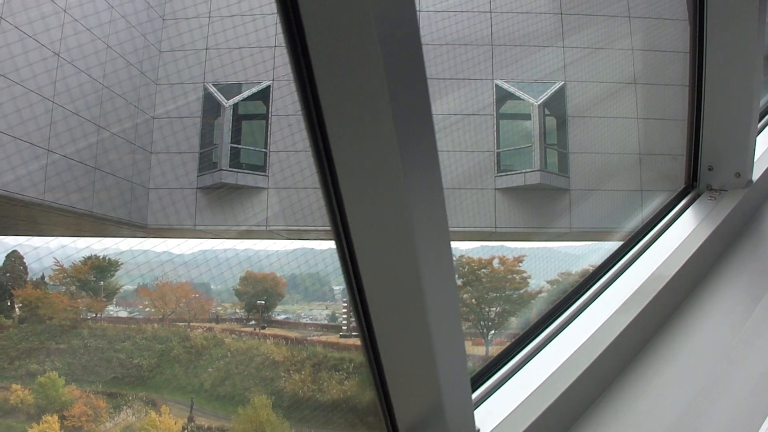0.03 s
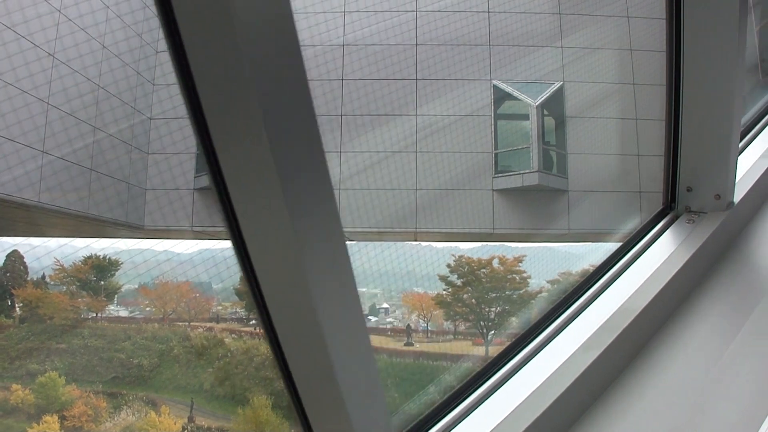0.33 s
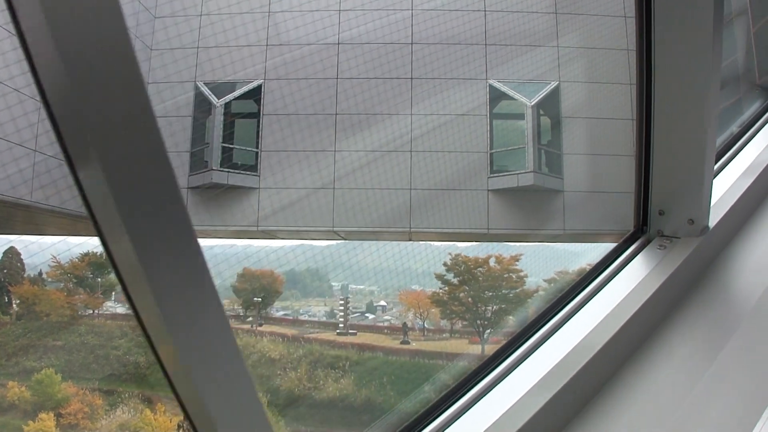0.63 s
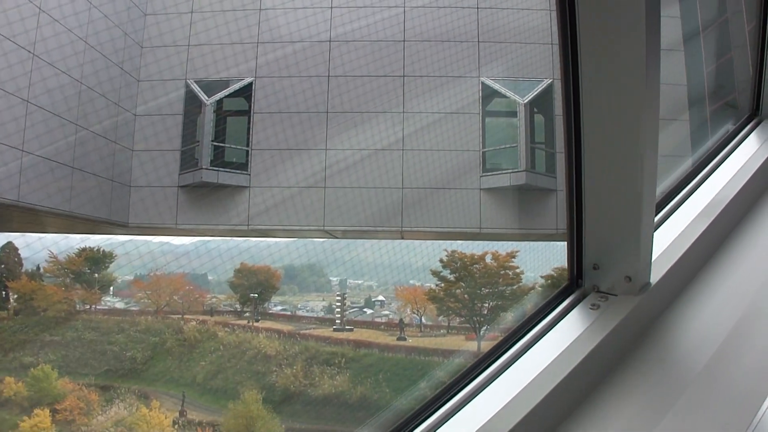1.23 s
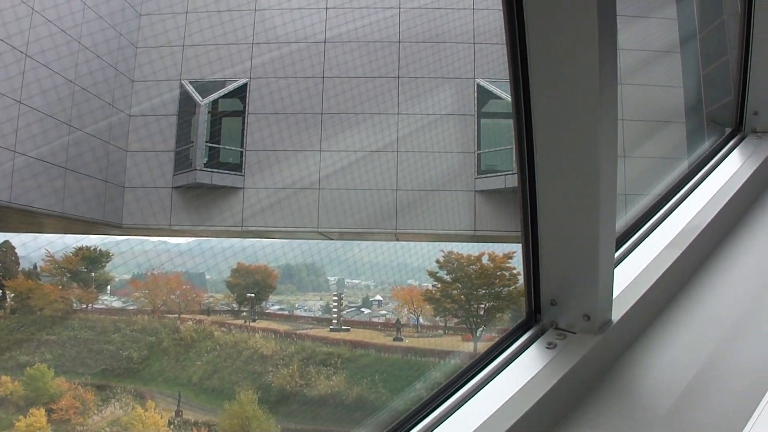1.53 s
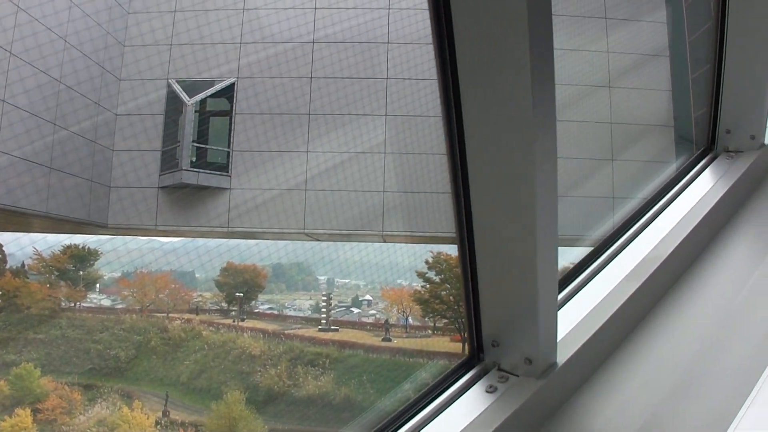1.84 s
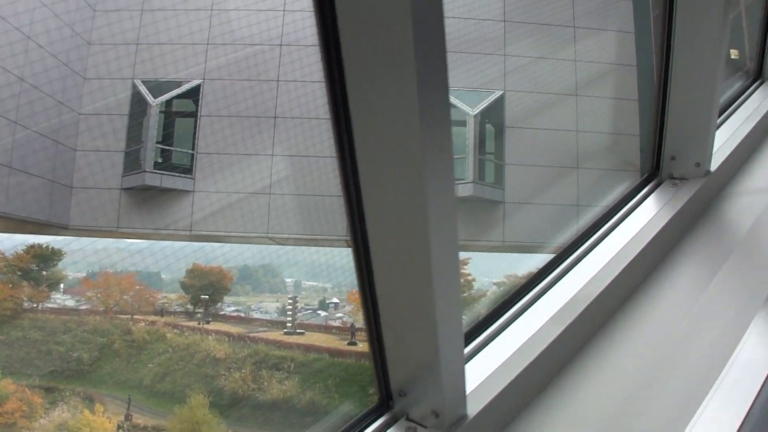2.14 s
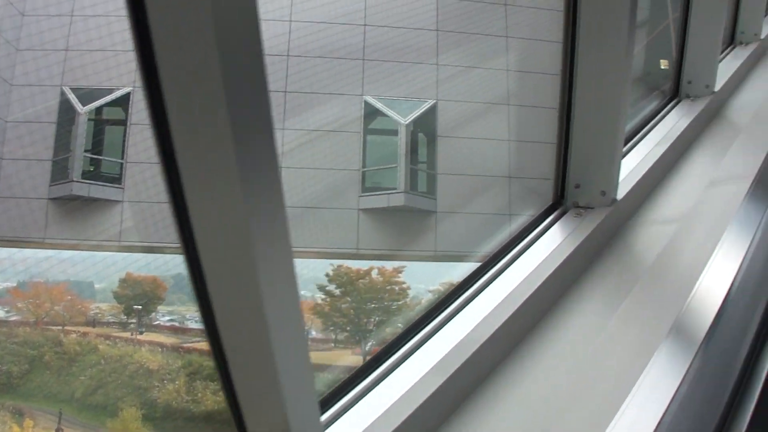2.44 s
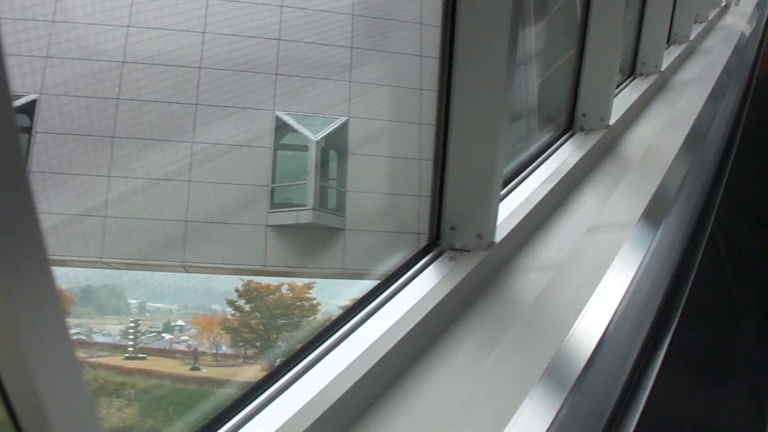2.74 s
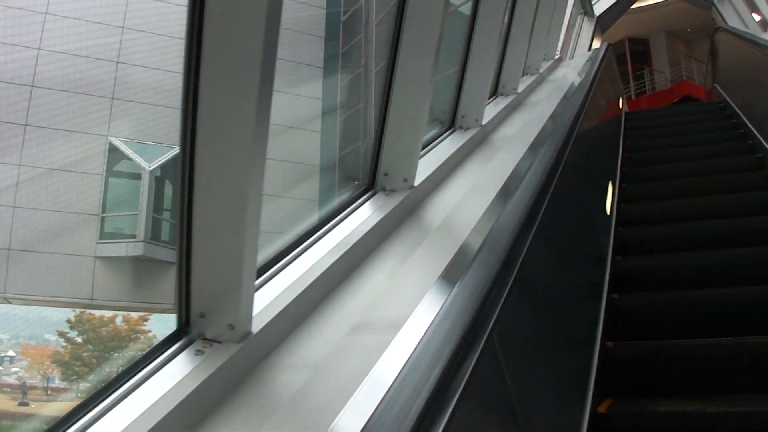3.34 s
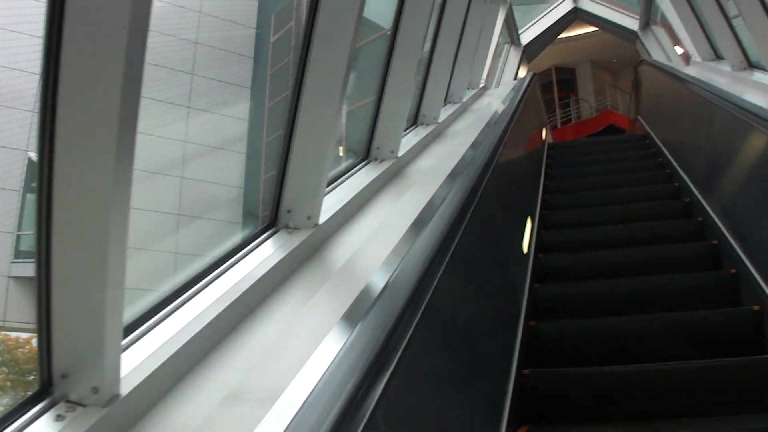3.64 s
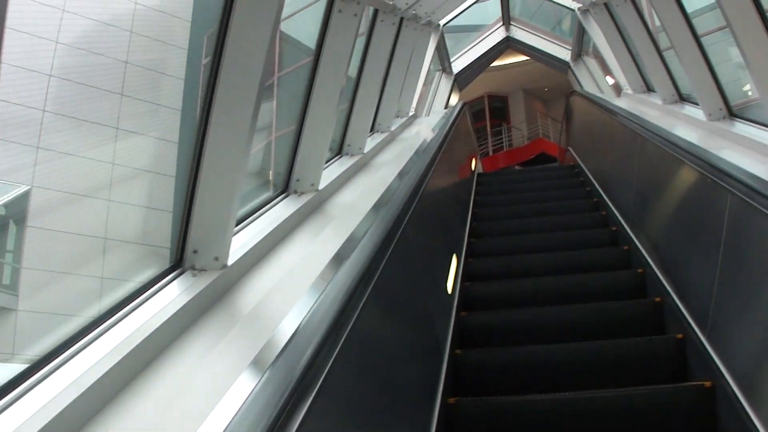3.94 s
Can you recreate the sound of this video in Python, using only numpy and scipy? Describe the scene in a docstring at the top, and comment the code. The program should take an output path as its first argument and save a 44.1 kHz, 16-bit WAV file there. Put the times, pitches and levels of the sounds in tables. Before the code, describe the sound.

An escalator runs with a steady rumble, low motor hum and faint wavering whine.

```python
"""Escalator ride up a glazed gallery

Steps and rollers rumble in the ringing truss over a low motor hum; now and then a roller groans.
The drive gear whines near 1.1 kHz, swelling and fading as the rider moves through the hall's
reflections. A hand-held camera adds its hiss and notches the treble."""
import sys
import numpy as np
from scipy import signal
from scipy.fft import rfft, irfft
from scipy.io import wavfile
from scipy.ndimage import uniform_filter1d

SR = 44100
rng = np.random.default_rng(int(sys.argv[2]) if len(sys.argv) > 2 else 0)


def wav_out(sig):
    """Save sig, one row per channel (or a flat mono array), as 16-bit PCM at SR to the path in sys.argv[1]."""
    wavfile.write(sys.argv[1], SR, np.round(np.clip(np.atleast_2d(sig).T, -1, 1) * 32767).astype(np.int16))


N = 176400

# Tone colour of the rolling steps and handrail: frequency_hz, relative_db
RUSH_SPECTRUM = [(20, -63), (48, -52), (66, -24), (90, -18.5), (150, -14), (185, -6), (240, -4),
                 (265, -3.5), (390, 1), (440, 0), (560, -1), (660, 2.5), (820, 2.5), (1020, -1),
                 (1400, -2.5), (1900, -6), (2350, -8), (2750, -18.5), (3500, -23.5), (5000, -29),
                 (9000, -50)]
# Swells of the gear's mesh tone along the ride: time_s, relative_db
WHINE_ENVELOPE = [(0.05, -36.5), (0.2, -31.5), (0.3, -41.5), (0.44, -33), (0.61, -38), (0.7, -32.5),
                  (0.97, -39), (1.28, -32), (1.41, -42), (1.48, -36), (1.63, -31.5), (1.7, -43),
                  (1.85, -43), (1.91, -26.5), (2.0, -29.5), (2.05, -38), (2.12, -28.7), (2.32, -31.5),
                  (2.57, -37), (2.83, -37.0), (2.92, -45), (3.1, -36.7), (3.19, -43.1), (3.27, -29),
                  (3.38, -48), (3.46, -32), (3.69, -37), (3.78, -29.7), (4.0, -43.2)]
# Side tones, in multiples of the shaft speed above the mesh tone: shaft_order, level_db
SHAFT_TONES = [(1, -41.5), (2, -49), (4, -45.5)]
# Resonances of the truss and steps: pitch_hz, half_width_hz, level_db
TRUSS_MODES = [(195.4, 12.6, -47), (212.6, 8.2, -48), (260.2, 11.5, -44), (289, 19, -43), (322, 20, -41.5),
               (337, 7.8, -45), (384, 23, -49.5), (479.5, 20, -43.5), (608, 39, -40.5), (757, 35, -41.5),
               (921, 4.9, -43.5), (1946, 18, -48), (2316, 13, -56), (2410, 14, -58)]
# Brief groans of the rollers: start_s, length_s, pitch_hz, level_db
ROLLER_GROANS = [(0.164, 0.2, 619, -33), (1.216, .2, 327, -34), (2.08, 0.133, 320, -36),
                 (2.4, 0.11, 326, -37)]
# Partials of the motor hum at mid-ride: pitch_hz, level_db
MOTOR_PARTIALS = [(97.5, -60), (190, -48.5)]
# Tone colour of the hiss: frequency_hz, relative_db
HISS_SPECTRUM = [(1000, -12.5), (3000, -7.5), (4500, -15), (5500, 1), (6300, 3), (7400, 2.5), (9000, -3),
                 (10000, -7), (11000, -14.5), (11700, -32), (12800, -53), (14000, -29), (15000, -19.5),
                 (15700, -17)]
# Stereo width, as an EQ on the side channel: frequency_hz, gain_db
STEREO_WIDTH = [(30, -20), (120, -23), (250, -27), (500, -20), (1000, -15.5), (2000, -10.5), (3500, -8.5),
                (6000, -5.5), (8000, -3), (10500, -.5), (15000, 2)]
# Where the camera's notch filters cut: centre_hz
NOTCH_CENTRES = [3010, 4010, 4990, 12100, 13450]
# How far each notch reaches to either side: half_width_hz
NOTCH_WIDTHS = [386, 465, 386, 700, 700]


def step_rush(level_db=-28.5, swell_db=0.32, flutter_db=0.25):
    """The main bed: steps and handrail roll along their tracks, never quite evenly."""
    level = amp(level_db + swell_db * wander(4) + flutter_db * wander(30))
    return level * shaped_noise(RUSH_SPECTRUM, patch_db=0.8)


def gear_whine(mesh_hz=1098.3, shaft_hz=24.8, waver_hz=1.46, smear_hz=6.2, trim_db=1):
    """Meshing teeth sing a tone, with side tones spaced by the shaft speed; the hall scatters them."""
    t = np.arange(N) / SR
    swells = amp(trim_db + np.interp(t, *np.transpose(WHINE_ENVELOPE)))
    mesh = phasor(mesh_hz + waver_hz * wander(2.84))
    mid = unit((mesh * (1 + 0.46 * drift(10.2))).real)
    side = 0.65 * unit((mesh * drift(smear_hz)).real)
    whine = swells * np.array([mid, side])
    for order, db in SHAFT_TONES:
        tone = mesh * phasor(round(order) * shaft_hz)
        whine += amp(db) * np.array([unit((tone * drift(smear_hz)).real) for _ in range(2)])
    return whine


def truss_ring(jolt_db=0.5, jolt_hz=5.8):
    """Uneven jolts of the rollers keep the frame's resonances ringing."""
    jolts = unit(amp(jolt_db * wander(jolt_hz)))
    hz = np.fft.rfftfreq(N, 1 / SR)
    power = np.zeros_like(hz)
    for pitch, half_width, db in TRUSS_MODES:
        resonance = unit(1 / (1 + ((hz - pitch) / half_width) ** 2))
        power += (amp(db) * resonance) ** 2
    shaking = rng.standard_normal((2, N))
    return jolts * irfft(rfft(shaking) * np.sqrt(power), N)


def roller_groans(waver_hz=3.95):
    """A roller sings for a moment, swelling and dying away."""
    t = np.arange(N) / SR
    groans = np.zeros(N)
    for start, length, pitch, db in ROLLER_GROANS:
        arch = np.sin(np.pi * np.clip((t - start) / length, 0, 1))
        tone = unit(phasor(pitch + waver_hz * wander(15.5)).real)
        groans += amp(db) * arch * tone
    return groans


def motor_hum(rise_db_per_s=2.3, wobble=1.1):
    """The motor's low, unsteady hum grows as the rider climbs."""
    climb = amp(rise_db_per_s * (np.arange(N) - N / 2) / SR)
    hum = np.zeros((2, N))
    for channel in hum:
        for pitch, db in MOTOR_PARTIALS:
            partial = phasor(pitch) * (1 + wobble * drift(5.4))
            channel += amp(db) * unit(partial.real)
    return climb * hum


def camera_hiss(level_db=-46, flicker_db=0.53):
    """The camera lays a fine, nearly steady treble hiss behind everything."""
    return amp(level_db + flicker_db * wander(30)) * shaped_noise(HISS_SPECTRUM, patch_db=0)


def amp(db):
    """Decibels to gain."""
    return 10 ** (np.asarray(db) / 20)


def unit(x):
    """Scales to rms 1."""
    return x / np.sqrt(np.mean(abs(x) ** 2) + 1e-20)


def equalise(sound, curve):
    """Applies an EQ curve, its points joined on a log-frequency axis."""
    hz = np.fft.rfftfreq(N, 1 / SR)
    points_hz, points_db = np.transpose(curve)
    gain_db = np.interp(np.log(hz + 1), np.log(points_hz + 1), points_db)
    return irfft(rfft(sound) * amp(gain_db), N)


def drift(rate_hz):
    """A smooth random modulator of level and phase, moving at up to about rate_hz."""
    hz = np.fft.fftfreq(N, 1 / SR)
    spectrum = rng.standard_normal(N) + 1j * rng.standard_normal(N)
    return unit(np.fft.ifft(spectrum / (1 + (hz / rate_hz) ** 4)))


def wander(rate_hz):
    """A smooth random control curve of rms 1."""
    return unit(drift(rate_hz).real)


def phasor(hz):
    """A complex oscillator that follows hz."""
    return np.exp(2j * np.pi * np.cumsum(hz * np.ones(N)) / SR)


def shaped_noise(spectrum, patch_db):
    """Two unrelated noises (mid, side) with one colour and shared louder and softer patches."""
    grid = (513, N // 256 + 6)  # bands, frames
    grains = rng.standard_normal((2, *grid)) + 1j * rng.standard_normal((2, *grid))
    patches = uniform_filter1d(rng.standard_normal(grid), size=9, axis=0)
    patches = unit(uniform_filter1d(patches, size=14, axis=1))
    _, mottled = signal.istft(grains * amp(patch_db * patches), nperseg=1024, noverlap=768)
    return unit(equalise(mottled[:, :N], spectrum))


def scene():
    """The mix at two close microphones: near mono in the bass, wide in the treble, groans centred."""
    mid, side = step_rush() + gear_whine() + truss_ring() + motor_hum() + camera_hiss()
    side = equalise(side, STEREO_WIDTH)
    return np.array([mid + side, mid - side]) + roller_groans()


def record(dry, start_s=0.041, fade_s=0.014, cutoff_hz=15750):
    """The camera notches the treble, switches on with a quick fade and cuts the very top."""
    hz = np.fft.rfftfreq(N, 1 / SR)
    notches = np.ones_like(hz)
    for centre, half_width in zip(NOTCH_CENTRES, NOTCH_WIDTHS):
        notches *= abs(hz - centre) / np.hypot(hz - centre, half_width)
    fade_in = np.clip((np.arange(N) / SR - start_s) / fade_s, 0, 1)
    sound = fade_in * irfft(rfft(dry) * notches, N)
    lowpass = signal.firwin(1023, cutoff_hz, window=("kaiser", 9), fs=SR)
    return signal.oaconvolve(sound, lowpass[None], "same")


dry = scene()
out = record(dry)
wav_out(out)
```